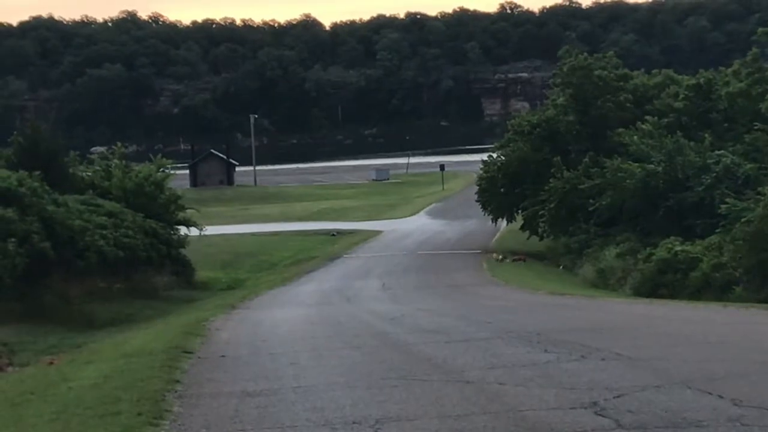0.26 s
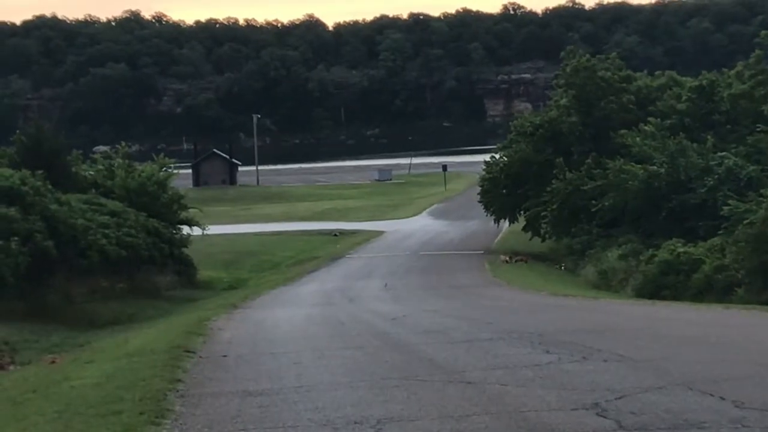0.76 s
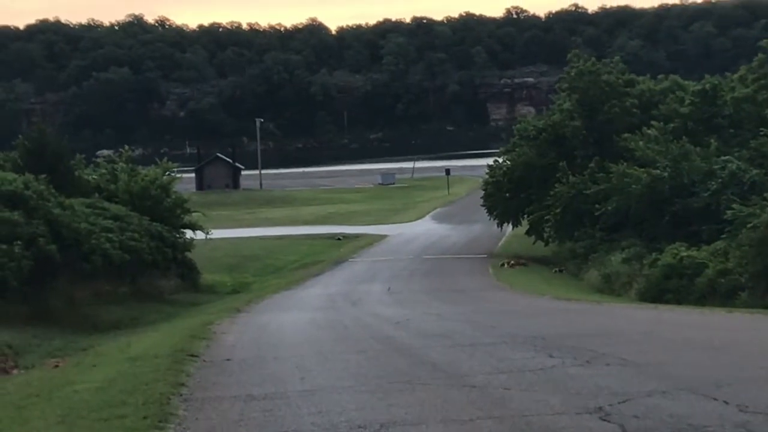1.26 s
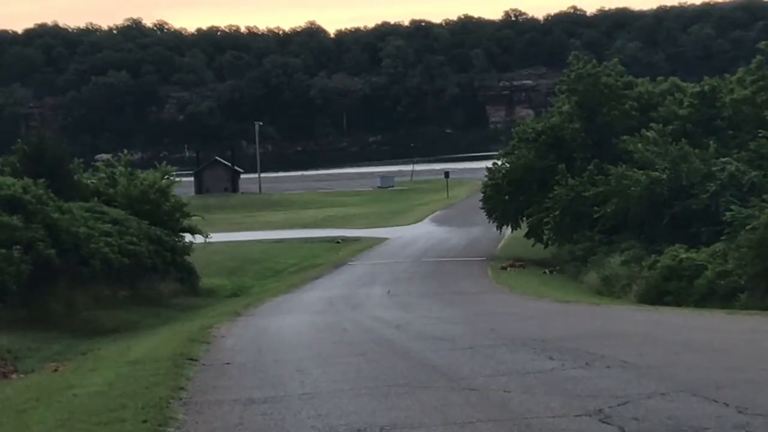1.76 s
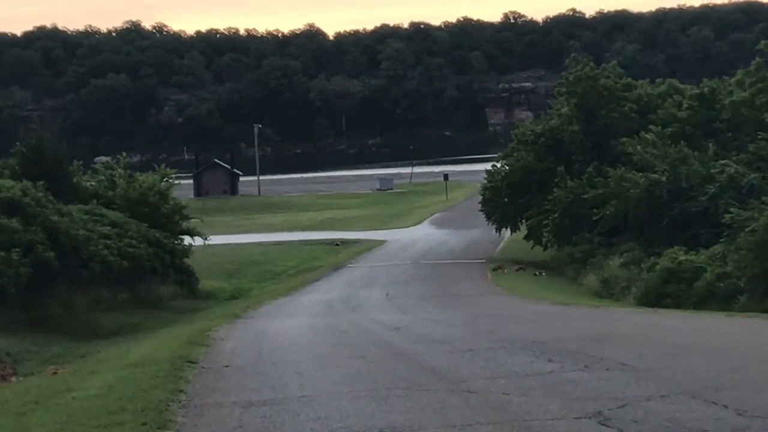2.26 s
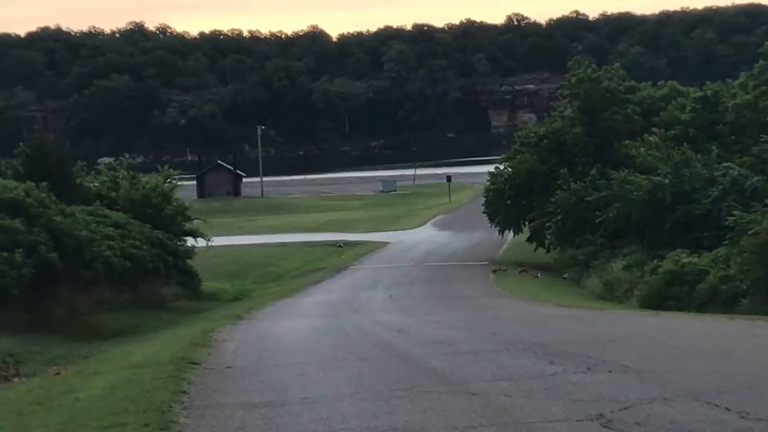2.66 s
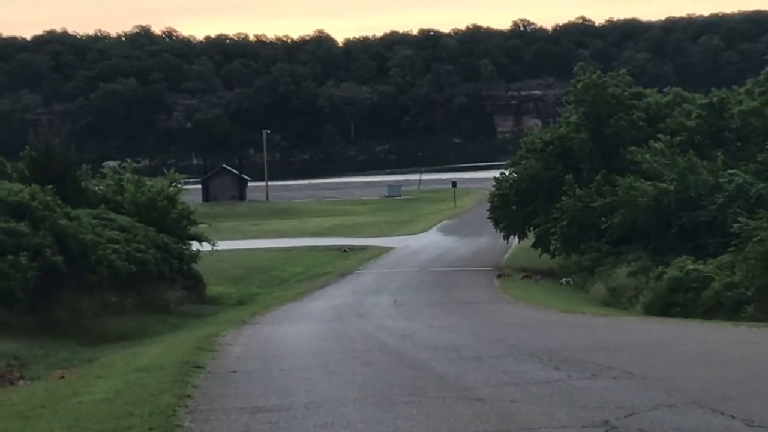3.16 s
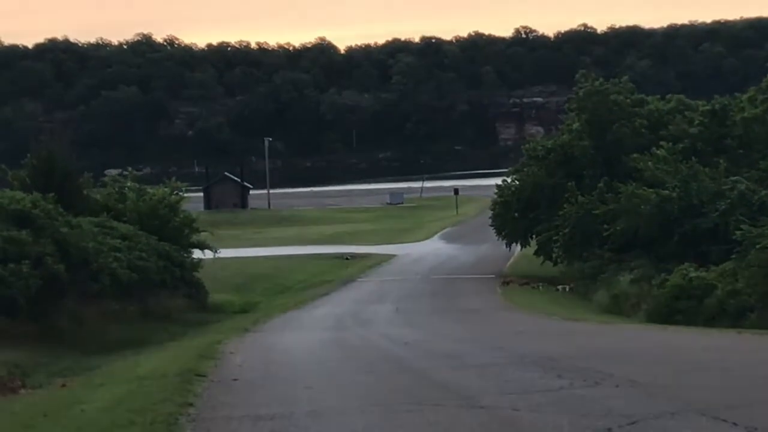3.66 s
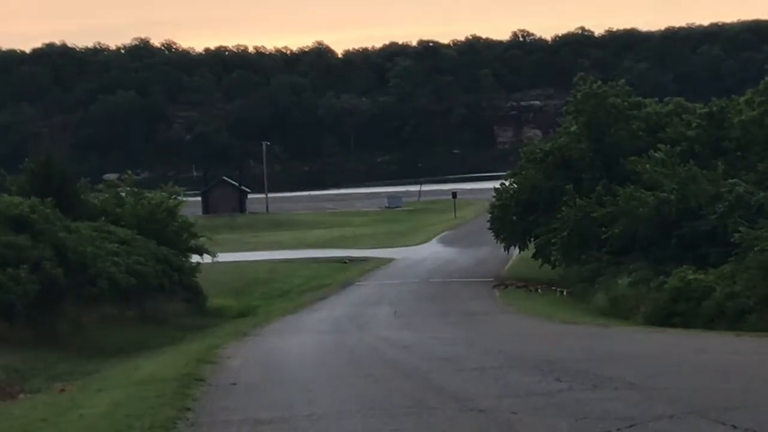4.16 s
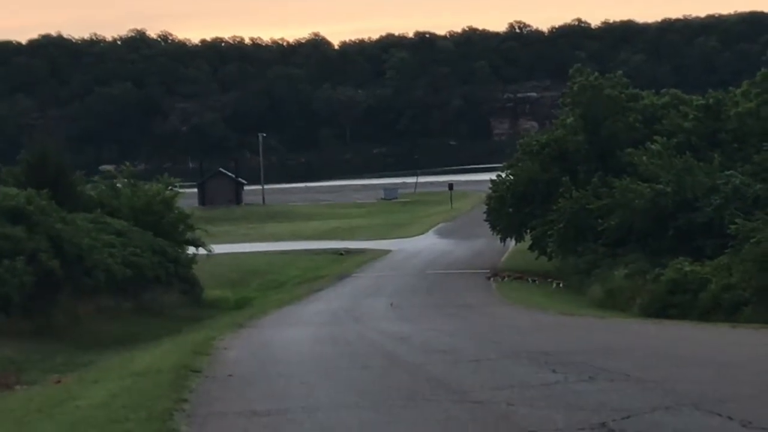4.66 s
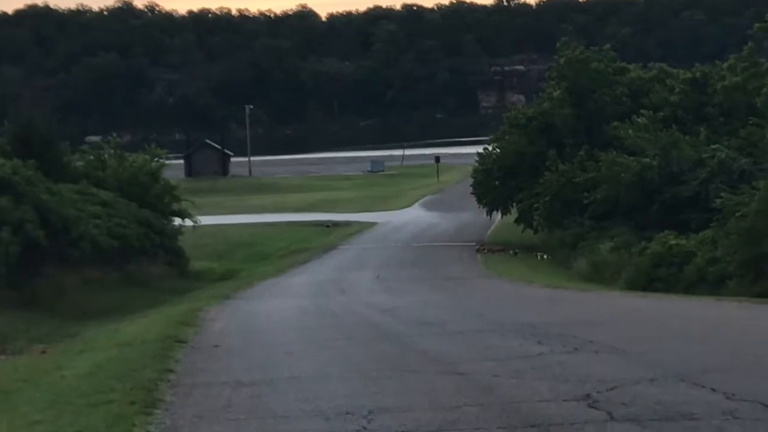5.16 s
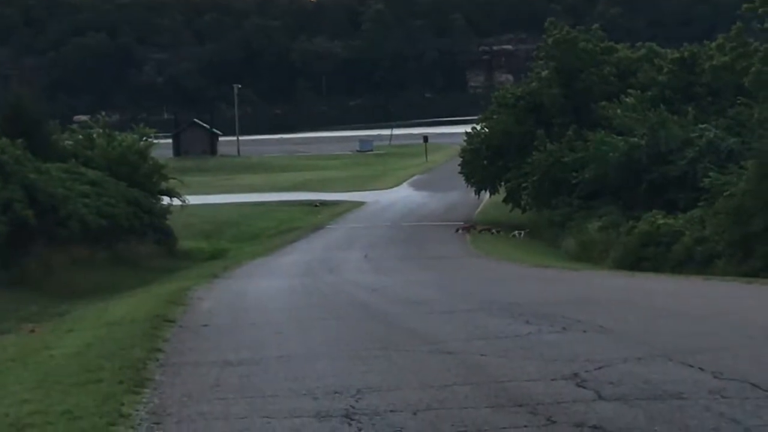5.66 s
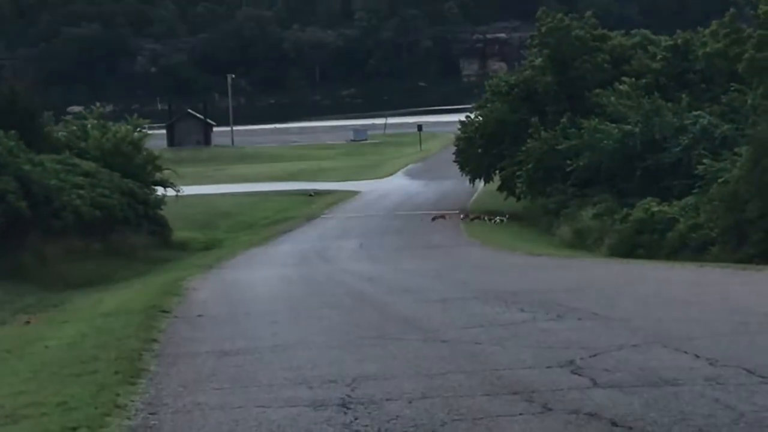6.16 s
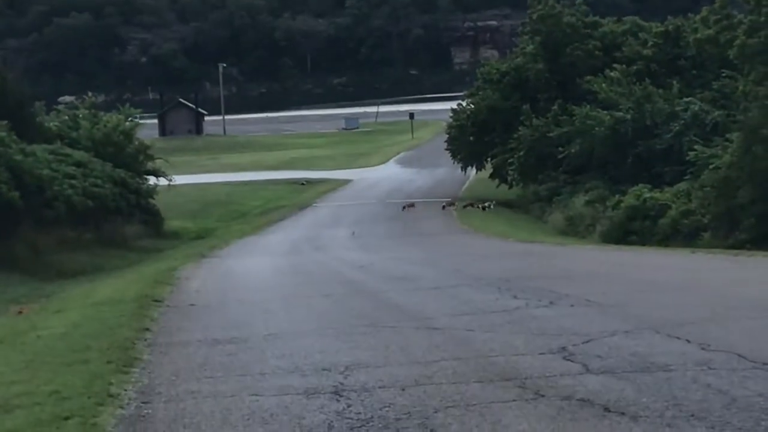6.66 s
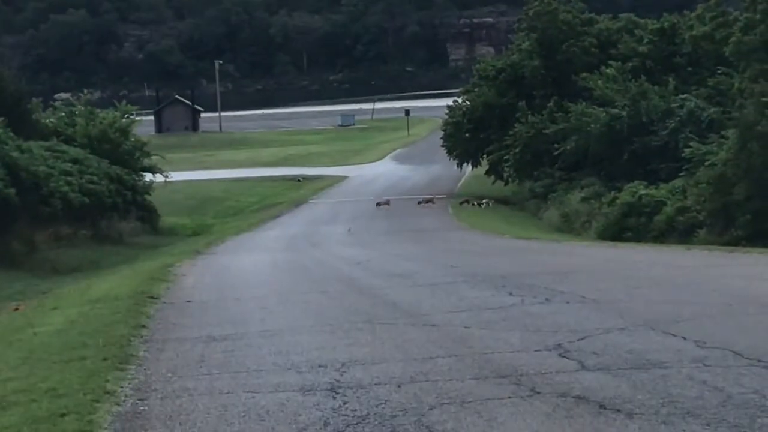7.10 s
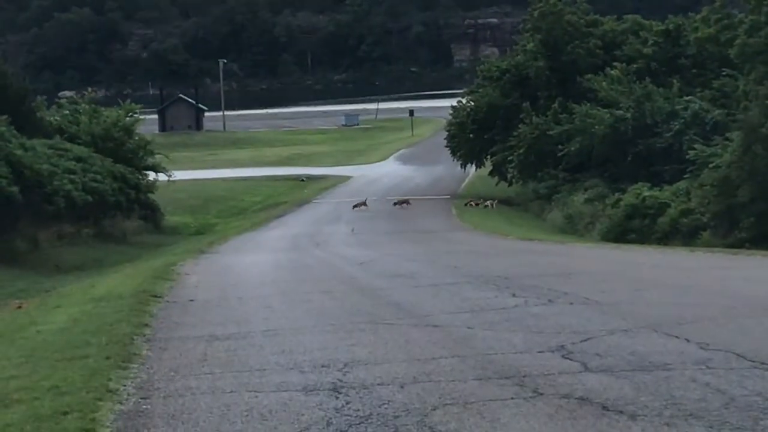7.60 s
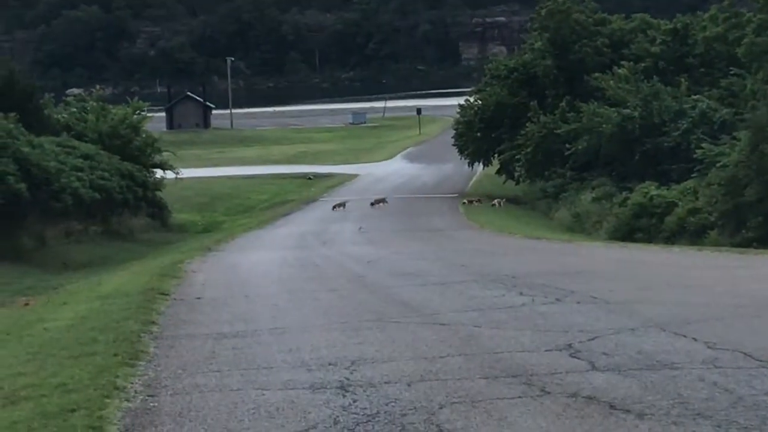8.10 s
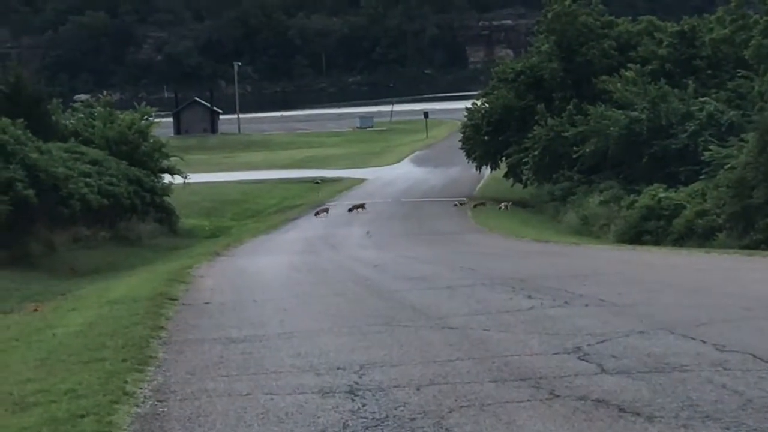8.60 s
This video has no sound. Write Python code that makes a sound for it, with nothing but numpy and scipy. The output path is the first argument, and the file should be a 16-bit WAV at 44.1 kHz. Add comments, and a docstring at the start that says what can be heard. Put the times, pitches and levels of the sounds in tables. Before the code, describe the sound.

Outdoor evening sound of a hound pack running far down a road. Rounded, nearly pure mid-pitched howls scoop up, break open and droop, mixed with rough barks, squeaky catches and high yelps. Calls come in spaced bursts, crowd together in the middle, then return strongly with deeper, fainter hounds behind. Woodland reverberation fills the gaps over faint hiss, microphone air and occasional thin whistles, perhaps birds.

```python
"""A park road between wooded slopes: far down it a pack of beagles gives tongue.
Arching bays and howls are strong fundamentals with weak, fluttering overtones, mostly near the 620 Hz mouth resonance.
Hoarse barks and catches add growl and rasp; thin high glides, squeaks, deeper far hounds and faint whistles
(some perhaps birds) are nearly pure tones. The woods answer every call with a scattered echo;
filtered noise makes the hush, hiss and air on the microphone."""
import sys
import numpy as np
from scipy import signal
from scipy.fft import rfft, irfft, next_fast_len
from scipy.io import wavfile
from scipy.ndimage import map_coordinates

SR = 44100
rng = np.random.default_rng(int(sys.argv[2]) if len(sys.argv) > 2 else 0)


def unload_audio(sound):
    """Save the sound as a 16-bit wav file, at the path given as the first command line argument."""
    columns = np.transpose(np.atleast_2d(sound))
    # keep every value between -1 and 1, then stretch to whole-number steps
    steps = np.round(np.clip(columns, -1, 1) * 32767)
    wavfile.write(sys.argv[1], SR, steps.astype(np.int16))


N = 389844


def amp(db):
    """Decibels to gain."""
    return 10 ** (np.asarray(db) / 20)


def unit(x):
    """Scale to rms 1."""
    return x / np.sqrt(np.mean(np.abs(x) ** 2) + 1e-20)


def ramp(x):
    """Hold within 0 to 1."""
    return np.clip(x, 0, 1)


def along(points, hz):
    """Read (f/Hz, value) points on a log frequency axis."""
    f, value = np.transpose(points)
    return np.interp(np.log(hz + 1), np.log(f + 1), value)


def filtered(x, response):
    """Shape the spectrum of x by a gain that depends on frequency."""
    size = next_fast_len(len(x) + 8192)
    gain = response(np.fft.rfftfreq(size, 1 / SR))
    return irfft(rfft(x, size) * gain, size)[:len(x)]


def noise(spectrum, size):
    """White noise coloured by (f/Hz, level/dB) points, at rms 1."""
    white = rng.standard_normal(size)
    return unit(filtered(white, lambda hz: amp(along(spectrum, hz))))


def wobble(rate, size):
    """A smooth random curve through this many random knots a second."""
    knots = rng.standard_normal(4096)
    return map_coordinates(knots, [np.arange(size) * rate / SR], mode="wrap")


def cycles(pitch, jitter, rate):
    """Phase of an oscillator whose pitch trembles by the share jitter."""
    trembling = pitch * (1 + jitter * wobble(rate, len(pitch)))
    return 2 * np.pi * np.cumsum(trembling) / SR


def span(start, end):
    """Sample times of one call, at least 10 ms long."""
    return np.arange(round(start * SR), round(max(end, start + .01) * SR)) / SR


def add(track, t, call, edge=0.0021):
    """Mix a call into the track with raised-sine fades of edge seconds."""
    fade = np.clip(np.minimum(t - t[0], t[-1] - t) / edge, 0, 1)
    room = track[max(round(t[0] * SR), 0):][:len(t)]
    room += (call * np.sin(fade * np.pi / 2) ** 2)[:len(room)]


# still evening and hiss: (f/Hz, level/dB)
HUSH_SPECTRUM = [(80, -27), (150, -26), (300, -8), (450, -9), (700, -10), (1200, -12.5), (2000, -19),
                 (3000, -21), (4500, -24.5), (6300, -26), (10000, -29), (14000, -31)]


def hush(air_db=-69):
    """Steady outdoor hush and hiss: one even bed of coloured noise."""
    return amp(air_db) * noise(HUSH_SPECTRUM, N)


# steady air on the microphone: (f/Hz, level/dB)
RUMBLE_SPECTRUM = [(15, -36.5), (30, -13.5), (45, -1.5), (85, -3.5), (120, -6.5), (200, -10), (350, -15),
                   (700, -54), (2000, -100)]
BUFFET_DB, CALMING_DB_PER_S = -64, 0.32  # level at the start, and how it dies down


def buffet():
    """Air on the microphone: a low, slightly uneven rumble that calms steadily."""
    t = np.arange(N) / SR
    level_db = BUFFET_DB - CALMING_DB_PER_S * t + 0.88 * wobble(10, N)
    return amp(level_db) * noise(RUMBLE_SPECTRUM, N)


# soft bumps of air: (t/s of the middle, half width/s down to 1/e, level/dB)
AIR_BUMPS = [(.285, 0.034, -47), (.41, 0.024, -46), (1.22, 0.032, -53), (1.625, 0.013, -46.5),
             (2.281, 0.037, -52.5), (2.96, 0.025, -55), (4.212, .011, -59), (4.578, 0.025, -55),
             (5.005, 0.016, -51), (5.102, 0.025, -58)]
# a bump of air is duller than the steady rumble: (f/Hz, level/dB)
BUMP_SPECTRUM = [(15, -30.5), (35, -7.5), (55, 9.5), (95, 1), (140, -10.5), (220, -23), (500, -45.5),
                 (2000, -100)]


def air_bumps():
    """Soft bumps of air on the microphone: dull noise swelling and fading under bell curves."""
    t = np.arange(N) / SR
    envelope = sum(amp(level) * np.exp(-((t - at) / width) ** 2) for at, width, level in AIR_BUMPS)
    return envelope * noise(BUMP_SPECTRUM, N)


# how long the slopes ring at each pitch: (f/Hz, t60/s)
SLOPE_DECAY = [(300, 2), (650, 1.16), (1400, 3.3), (4000, 0.73)]


def tail(delay=0.025, build=0.013, near_db=6, near_t60=0.36):
    """Roadside bushes give a short, strong echo; the slopes scatter a longer, weaker one, by frequency."""
    hz, t, z = signal.stft(rng.standard_normal(SR + SR // 2), SR, nperseg=256)
    onset = 1 - np.exp(-np.maximum(t - delay, 0) / build)
    bushes = amp(near_db - 60 * t / near_t60)
    slopes = amp(-60 * t / along(SLOPE_DECAY, hz)[:, None])
    answer = signal.istft(z * onset * (bushes + slopes), SR, nperseg=256)[1]
    # unit gain in the band of the voices, 500 to 750 Hz
    voiced = np.abs(rfft(answer, 2 * SR))[1000:1500]
    return answer / np.sqrt(np.mean(voiced ** 2))


def woods(x, count=18):
    """Scattered echo, drawn afresh for each overlapping slice of the calls."""
    out = np.zeros(N + 3 * SR)
    hop = N // count + 1
    padded = np.pad(x, (hop, 2 * hop))
    for start in range(0, N + hop, hop):
        piece = padded[start:start + 2 * hop] * np.hanning(2 * hop)
        answer = signal.fftconvolve(piece, tail())
        room = out[start:start + len(answer)]
        room += answer[:len(room)]
    return out[hop:hop + N]


def thin_calls(table, bow, sag_db, jitter, second_db):
    """Nearly pure gliding tones with a weak octave; pitch (by the share bow) and level droop at both ends."""
    out = np.zeros(N)
    for start, length, middle_hz, glide_hz, db in table:
        t = span(start, start + length)
        place = np.linspace(-1, 1, len(t))
        pitch = middle_hz * (1 - bow * place ** 2) + glide_hz * place / 2
        phase = cycles(pitch, jitter, rate=140)
        tone = np.sin(phase) + amp(second_db) * np.sin(2 * phase)
        add(out, t, np.sqrt(2) * amp(db - sag_db * place ** 2) * tone)
    return out


# faint high whistled tones: (t/s, length/s, middle f/Hz, glide f/Hz, mid-call level/dB)
FAINT_WHISTLES = [(.76, 0.14, 2840, -200, -77), (1.69, .19, 2545, -92, -78), (4.02, 0.16, 2520, -87.5, -86),
                  (4.97, 0.075, 2295, -19.5, -74), (5.02, 0.16, 2517, -120, -77.5),
                  (6.39, 0.087, 2740, -420, -72), (7.42, 0.24, 2560, -72, -80.5)]


def faint_whistles():
    """Faint high whistled tones with soft ends: some perhaps birds, some octave overtones of yelps."""
    return thin_calls(FAINT_WHISTLES, bow=0.0035, sag_db=8, jitter=0.014, second_db=-32.5)


# hounds much deeper in the woods: (t/s, length/s, middle f/Hz, glide f/Hz, mid-call level/dB)
DEEP_WOODS_HOWLS = [(6.1, 0.22, 459, 93, -68), (7.7, .4, 443, -70.5, -69.5), (8.42, 0.54, 433, 2.5, -66.5)]


def far_howls():
    """Hounds deeper in the woods: low tones whose pitch trembles widely."""
    return thin_calls(DEEP_WOODS_HOWLS, bow=.03, sag_db=2.5, jitter=.08, second_db=-15.5)


# thin high gliding tones: (t/s, length/s, middle f/Hz, glide f/Hz, mid-call level/dB)
HIGH_GLIDES = [ (.295, 0.11, 1415, -110, -67), (.688, 0.11, 1313, -250, -64),
               (2.0, 0.066, 1520, -150, -72.5), (2.105, .12, 1403, -180, -63.5),
               (2.452, 0.098, 1338, -140, -65.5), (2.79, 0.092, 1290, -280, -62.5),
               (2.862, 0.051, 1148, 97, -63.5), (3.098, 0.04, 1290, -14, -63), (3.2, .047, 1046, 78, -64.5),
               (3.412, 0.034, 1000, 119, -65), (4.635, 0.11, 1550, -52, -74),
               (5.105, 0.031, 967, -58.5, -57.5), (5.16, 0.083, 1255, -190, -62.5),
               (5.92, 0.091, 1140, 197.5, -65), (5.998, 0.056, 1324, -45.5, -59.5),
               (6.818, .06, 1240, 130, -60.5), (6.897, 0.048, 1422, -71, -57.5),
               (7.097, 0.048, 1020, -160, -54), (7.815, .094, 1570, -160, -71.5),
               (7.915, 0.084, 1390, -14, -60.5), (8.22, 0.094, 1265, -180, -55.5),
               (8.518, 0.06, 1305, 108, -59), (8.578, 0.091, 1165, -110, -59.5), ]
# squeaks as the voice catches before a call: (t/s, middle f/Hz, mid-call level/dB)
CATCHES = [(0.444, 919, -58), (1.709, 913, -57.5), (2.367, 850, -54.5), (4.342, 895, -57.5),
           (4.712, 1023, -61.5), (6.342, 975, -52), (7.168, 956, -50), (7.585, 1027, -52),
           (8.682, 1110, -47.5)]
SQUEAK_S, SQUEAK_GLIDE_HZ = .027, 60  # length and upward slide of every squeak


def high_glides_and_squeaks():
    """Thin high glides (falling yelps, rising octave overtones of barks), and squeaks as a voice catches."""
    squeaks = [(start, SQUEAK_S, hz, SQUEAK_GLIDE_HZ, db) for start, hz, db in CATCHES]
    return thin_calls(list(HIGH_GLIDES) + squeaks, bow=.04, sag_db=6, jitter=.008, second_db=-28)


# hoarse air through the mouth: (f/Hz, level/dB)
RASP_SPECTRUM = [(250, -42), (450, -20), (560, -0.5), (700, 2), (840, -6), (1000, -6.5), (1280, -9),
                 (1550, -18.5), (2200, -26), (3200, -35), (6000, -69.5)]


def hoarse_air(size):
    """Breath noise coloured by the mouth, at rms 1."""
    return noise(RASP_SPECTRUM, size)


def arch(start, rise, length, crest_hz, climb_hz, drop_hz):
    """One push of the chest: the pitch climbs to a crest and drops; slack is 0 at the crest, 1 at the ends."""
    t = span(start, start + length)
    crest = min(rise, .9 * length)
    slack = np.interp(t - start, [0, crest, length], [1, 0, 1]) ** 2
    bend_hz = np.where(t - start < crest, climb_hz, drop_hz)
    return t, crest_hz - slack * bend_hz, slack


# hoarse barks, and the rough catches that close some bays and howls;
# the rise is held to 0.9 of the length and the roughness to 0-1:
# (t/s, rise/s, length/s, crest f/Hz, final drop f/Hz, voice level at the crest/dB, roughness)
BARKS_AND_CATCHES = [ (.753, 0.022, 0.086, 633, 150, -46, 0.23), (1.144, 0.0442, .128, 669, 170, -40, 0.27),
                     (1.847, 0.019, 0.057, 664, 150, -52.5, .65),
                     (2.185, 0.02, 0.066, 633, 128, -47.5, 0.15),
                     (2.499, 0.0059, 0.095, 624.4, 64, -47.5, .46),
                     (2.823, 0.031, 0.082, 626, 170, -50, 0.36), (2.91, .02, 0.062, 561, 40, -60, 0.5),
                     (3.132, 0.059, 0.099, 639.4, 97, -41.5, 0.25),
                     (3.437, 0.049, 0.13, 655.6, 157, -41, 0.27),
                     (3.764, 0.052, .15, 635, 126, -42.5, 0.45), (4.358, .02, 0.19, 693, 15, -49.5, 0.42),
                     (4.387, 0.048, 0.1, 599.5, 80, -35.5, 0.29),
                     (4.721, 0.039, 0.19, 668.7, 92, -43.5, 0.5),
                     (4.753, 0.046, .16, 589.3, 83, -35.5, 0.16), (4.923, 0.033, 0.14, 614, 18, -55, 1.1),
                     (5.128, .1, 0.15, 615, 43, -48.5, 0.7), (5.62, 0.068, 0.085, 618, 10, -43.5, 0.9),
                     (5.701, 0.022, 0.062, 618, 90, -40.5, .25), (5.932, 0.054, .099, 611, 45, -47.5, 0.99),
                     (6.049, .009, 0.04, 595, 160, -47.5, 0.4),
                     (6.841, 0.0563, .067, 646.4, 12, -42.5, .35),
                     (6.88, 0.009, .077, 707.5, 51, -49.5, 0.32), (7.73, 0.008, 0.03, 673, 45, -47, 1.1),
                     (7.948, .046, 0.094, 607, 80, -43, .2), (8.253, 0.063, .11, 633.5, 150, -42, 0.1),
                     (8.553, 0.015, 0.11, 611, 43, -44.5, 0.6), (8.787, 0.029, 0.13, 671, 42, -51.5, 1.1), ]
CLIMB_HZ_PER_S, CREST_SWELL_DB = 1200, 10.5  # a longer rise starts lower; from the ends to the crest


def barks_and_catches(chaos_rate=170, chaos=0.85, growl=0.49, growl_hz=88, second_db=-32, rasp_db=-9.5,
                      jitter=0.016, clearing_db=7, grain_db=3):
    """Hoarse voices: a slow growl and irregular folds put side tones round the pitch, with rasp from the mouth."""
    out = np.zeros(N)
    for start, rise, length, crest_hz, drop_hz, db, rough in BARKS_AND_CATCHES:
        t, pitch, slack = arch(start, rise, length, crest_hz, CLIMB_HZ_PER_S * rise, drop_hz)
        size = len(t)
        rough = ramp(rough)
        phase = cycles(pitch, jitter, rate=143.3)
        scatter = unit(wobble(chaos_rate, size) + 1j * wobble(chaos_rate, size))
        beat = np.exp(1j * cycles(np.full(size, growl_hz), jitter=0.34, rate=50))
        folds = unit(1 + rough * (chaos * scatter + growl * beat)) * np.exp(1j * phase)
        voice = np.sqrt(2) * (folds.imag + amp(second_db) * (folds ** 2).imag)
        # the rasp comes in uneven bursts and clears as the call runs out
        clearing = clearing_db * np.linspace(0, 1, size) ** 2
        bursts = amp(grain_db * wobble(140, size) - clearing)
        rasp = rough * amp(rasp_db) * bursts * hoarse_air(size)
        add(out, t, amp(db - CREST_SWELL_DB * slack) * (voice + rasp), edge=0.0087)
    return out


# colour of the overtones: (f/Hz, level/dB)
MOUTH_COLOUR = [(900, 4.5), (1150, -3.5), (1350, -3.5), (1700, -12), (2000, -15.5), (2300, -15.5),
                (2700, -24.5), (3100, -39.5), (4000, -49.5)]


def throat(pitch, overtone_db, bright_db, rasp_db, split, jitter=.005, shimmer_db=1.1, half_db=-34,
           split_db=-9, flutter_db=4.5, smear=.5, strain_db=-12):
    """A clear voice: a strong fundamental, fluttering overtones shaped by the mouth, and a little rasp."""
    size = len(pitch)
    phase = cycles(pitch, jitter, rate=160)

    def partial(k):
        """One fluttering overtone; higher ones smear more in phase."""
        flutter = amp(flutter_db * wobble(45, size))
        return flutter * np.sin(k * phase + smear * (k - 1) / 2 * wobble(130, size))

    def stack(orders):
        """Sum of overtones, coloured by the mouth and tilted by the brightness."""
        return sum(amp(along(MOUTH_COLOUR, k * pitch) + bright_db * (k - 2.5)) * partial(k) for k in orders)

    orders = np.arange(2, 6)
    # folds that alternate strong and weak put lines halfway between the harmonics
    half = amp(half_db) * partial(1 + .5) + amp(overtone_db + split_db) * stack(orders + .5)
    voice = np.sqrt(2) * (np.sin(phase) + amp(overtone_db) * stack(orders) + split * half)
    # a strained voice, rich in overtones, also rasps more
    rasp = (amp(rasp_db) + amp(strain_db + overtone_db)) * hoarse_air(size)
    return amp(shimmer_db * wobble(70, size)) * (voice + rasp)


# smooth howls; the bend is the pitch drop at both ends as a share of the crest:
# (t/s, rise/s, length/s, crest f/Hz, bend 0-1, crest level/dB, overtone level at the crest/dB,
#  brightness/dB per harmonic, base rasp level/dB)
SMOOTH_HOWLS = [ (.462, 0.07, 0.15, 590.6, 0.1, -34, -33, 0, -35.5),
                (1.727, 0.1, 0.13, 577, 0.07, -38, -26, -10.5, -32),
                (2.382, 0.064, 0.14, 573.5, 0.16, -38.5, -27, -7.5, -35),
                (4.03, 0.034, .16, 587.5, 0.12, -35.5, -44, 1, -31.5),
                (5.25, 0.069, 0.17, 571, 0.12, -31.5, -37, 1, -31),
                (5.385, 0.064, 0.16, 520, 0.07, -43.5, -30, -2, -25),
                (5.365, 0.062, .16, 691.5, 0.2, -47.5, -20, 2.5, -23),
                (5.499, 0.073, .21, 655, 0.02, -52, -21.5, 5.5, -12.5),
                (5.54, 0.096, 0.19, 508, .05, -54, -21, -7, -27.5),
                (8.703, .06, 0.12, 573.4, .075, -35.5, -15, 1.7, -26.5), ]
BREATH_SWELL_DB = 6  # rise to the crest from the push of air
MOUTH_SWELL_DB = 105  # rise per unit of bend, as the pitch nears the mouth resonance


def howls():
    """One smooth arch each: the fundamental swells as it nears the mouth resonance, the overtones much less."""
    out = np.zeros(N)
    for start, rise, length, crest_hz, bend, db, overtone_db, bright_db, rasp_db in SMOOTH_HOWLS:
        bend_hz = bend * crest_hz
        t, pitch, slack = arch(start, rise, length, crest_hz, bend_hz, bend_hz)
        off_resonance_db = MOUTH_SWELL_DB * bend * slack
        voice = throat(pitch, overtone_db + off_resonance_db, bright_db, rasp_db, split=0)
        add(out, t, amp(db - BREATH_SWELL_DB * slack - off_resonance_db) * voice, edge=0.004)
    return out


# bays that scoop up squeezed, then break open:
# (t/s, time to the break/s, length/s, crest f/Hz, sag f/Hz, level before swells and fades/dB,
#  swell after the break/dB, squeeze/dB, open overtone level/dB, brightness/dB per harmonic,
#  base rasp level/dB, period doubling 0-1)
BREAKING_BAYS = [ (.137, 0.053, 0.45, 659, 43.6, -37, 5, 0, -32.5, -7, -40.5, 0.95),
                 (.836, .056, .153, 646.3, 62, -36, 1, 1.5, -35, -8, -31.5, 0.85),
                 (1.377, 0.0415, 0.16, 654.3, 58, -36, 0.5, 7.5, -38.5, -12, -33, 0.94),
                 (6.359, 0.032, 0.17, 676.8, 44, -32.5, 2.5, 8.5, -33.5, -13, -26, 0.45),
                 (7.177, 0.062, .15, 669.6, 12, -33, -0.5, 11, -25.5, -2, -30, .95),
                 (7.589, .074, .153, 663, 26, -32.5, -0.5, 12.5, -28, -5, -30, 1), ]
SCOOP, SCOOP_CURVE, SAG_CURVE = .23, 1.7, 1.4  # start: share under the crest; powers of climb and sag
ATTACK_S, ATTACK_DB = .028, 18  # a bay swells by this much at its start
RELEASE_S, RELEASE_DB, RELEASE_HZ = 0.031, 11, 66  # level and pitch collapse at its end
# the squeeze lets go this fast and flicks the pitch up, which then settles
BREAK_S, OVERSHOOT_HZ_PER_DB, SETTLE_S = 0.011, 3, 0.024
WAVER_HZ, WAVER_DEPTH_HZ = 7.2, 8.3  # slow pitch waver, at its top on the break
ACCENT_DB, ACCENT_S = 2, 0.037  # the voice flares briefly as it breaks open
# dB the overtones gain on the fundamental per dB of squeeze, and per dB of fade at the ends
SQUEEZE_PRESS, OVERTONE_HOLD = 1.78, 0.6


def bays():
    """The voice scoops up squeezed (weak fundamental, strong overtones), breaks open, sags and collapses."""
    out = np.zeros(N)
    for start, rise, length, crest_hz, sag_hz, db, swell_db, squeeze_db, overtone_db, *colour in BREAKING_BAYS:
        t = span(start, start + length)
        age, since_break = t - start, t - start - rise
        scoop = ramp(1 - age / rise)
        sag = ramp(since_break / (length - rise)) ** SAG_CURVE
        attack = ramp(1 - age / ATTACK_S)
        release = ramp(1 - (length - age) / RELEASE_S)
        opened = (1 + np.tanh(2 * since_break / BREAK_S)) / 2
        squeezed_db = squeeze_db * (1 - opened)
        settling = np.exp(-np.abs(since_break) / SETTLE_S)
        overshoot = OVERSHOOT_HZ_PER_DB * squeeze_db * opened * settling
        waver = WAVER_DEPTH_HZ * np.cos(2 * np.pi * WAVER_HZ * since_break)
        pitch = crest_hz * (1 - SCOOP * scoop ** SCOOP_CURVE) + overshoot + waver
        pitch = pitch - sag_hz * sag - RELEASE_HZ * release ** 2
        accent_db = ACCENT_DB * np.exp(-(since_break / ACCENT_S) ** 2)
        fade_db = ATTACK_DB * attack ** 2 + RELEASE_DB * release ** 2
        # the overtones keep out of the swell and hold on through the squeeze and the fades
        held_db = SQUEEZE_PRESS * squeezed_db + OVERTONE_HOLD * fade_db - swell_db * sag
        voice = throat(pitch, overtone_db + held_db, *colour)
        level_db = db + accent_db + swell_db * sag - squeezed_db - fade_db
        add(out, t, amp(level_db) * voice, edge=0.0042)
    return out


def scene():
    """The background, the pack and the thin high tones, and their answer from the woods."""
    background = hush() + buffet() + air_bumps()
    thin = faint_whistles() + far_howls() + high_glides_and_squeaks()
    pack = barks_and_catches() + howls() + bays()
    echo = woods(amp(-15.5) * pack + amp(-12) * thin)
    return (pack + thin + echo + background)[None]


# slight treble dips, a row at 0 dB leaving its band flat: (centre f/Hz, half width f/Hz down to 1/e, level/dB)
TREBLE_DIPS = [(4900, 530, 0), (7700, 420, -2.5), (10400, 500, -3)]
TOP_HZ = 15760  # band limit


def record(dry):
    """Slight treble dips near 7.7 and 10.4 kHz, and a band limit above which nothing is kept."""
    def response(hz):
        """Gain of the smooth dips, cut off at the band limit."""
        dip_db = sum(db * np.exp(-((hz - centre) / width) ** 2) for centre, width, db in TREBLE_DIPS)
        return amp(dip_db) * (hz < TOP_HZ)

    return filtered(dry[0], response)[None]


dry = scene()
out = record(dry)
unload_audio(out)
```